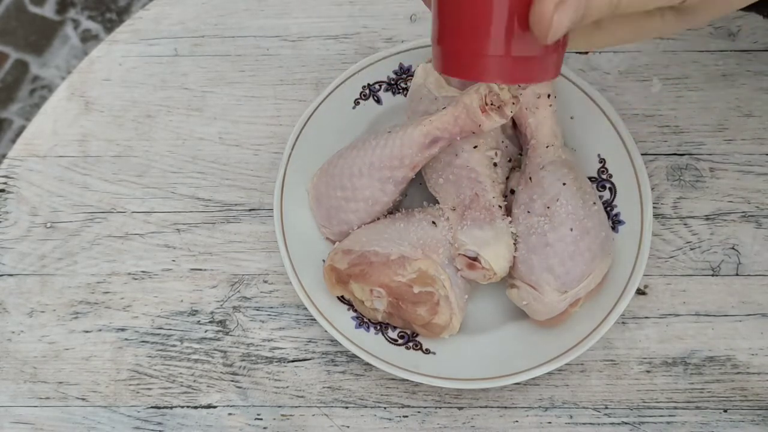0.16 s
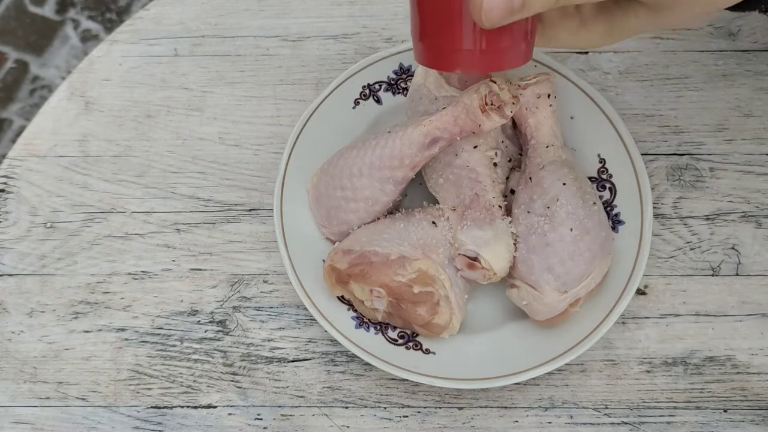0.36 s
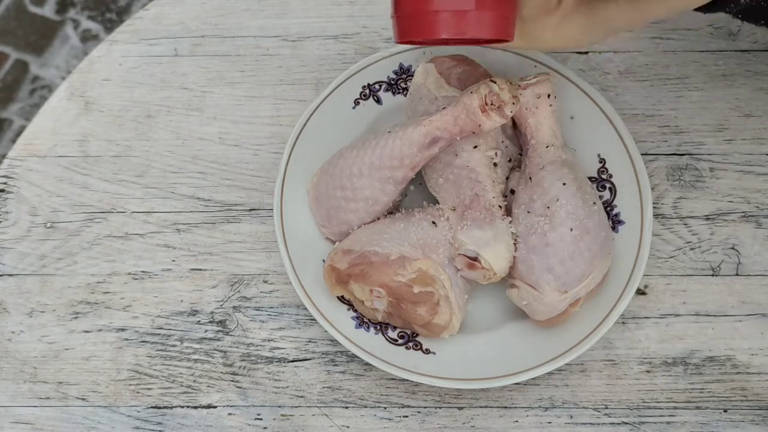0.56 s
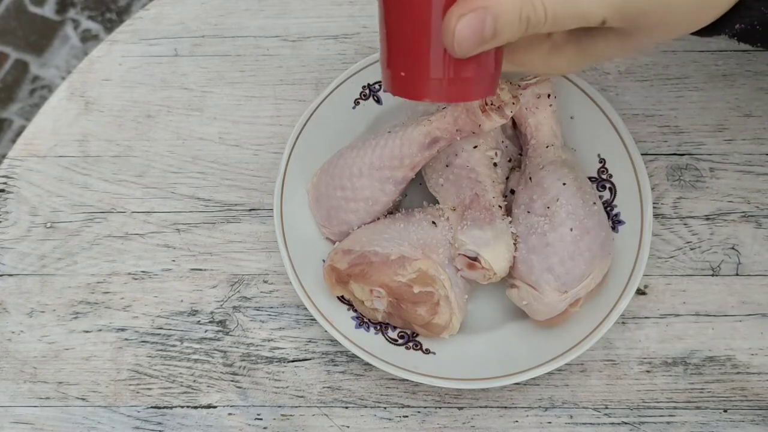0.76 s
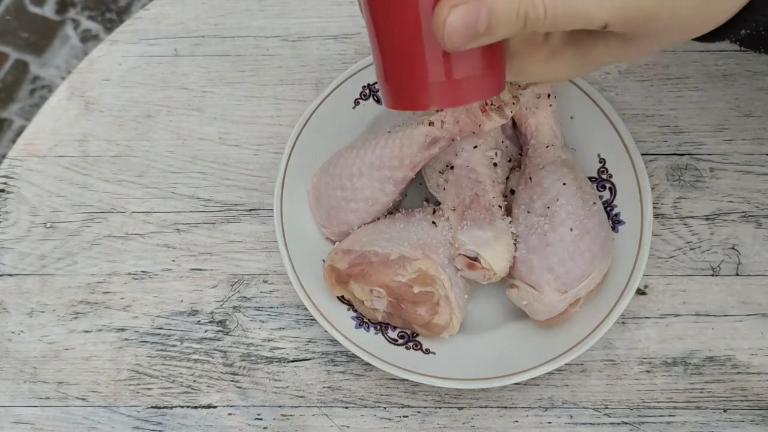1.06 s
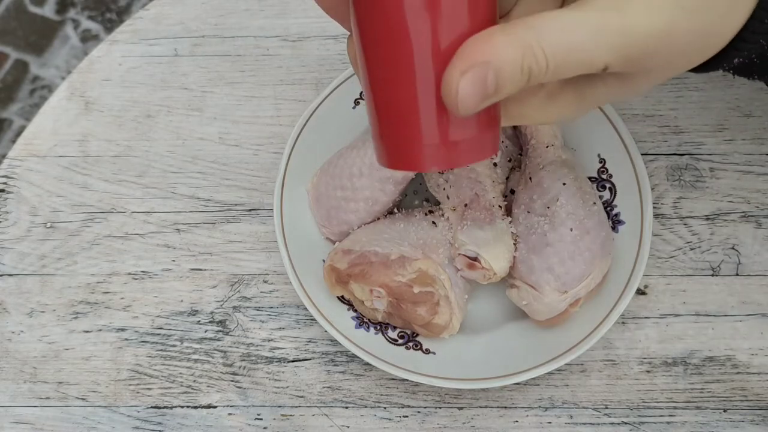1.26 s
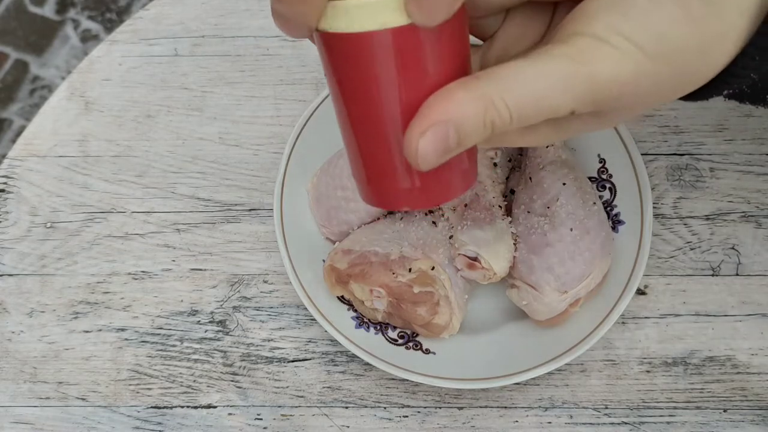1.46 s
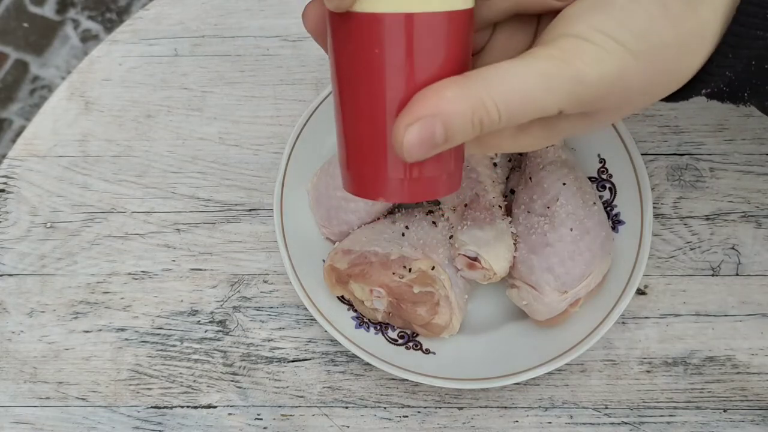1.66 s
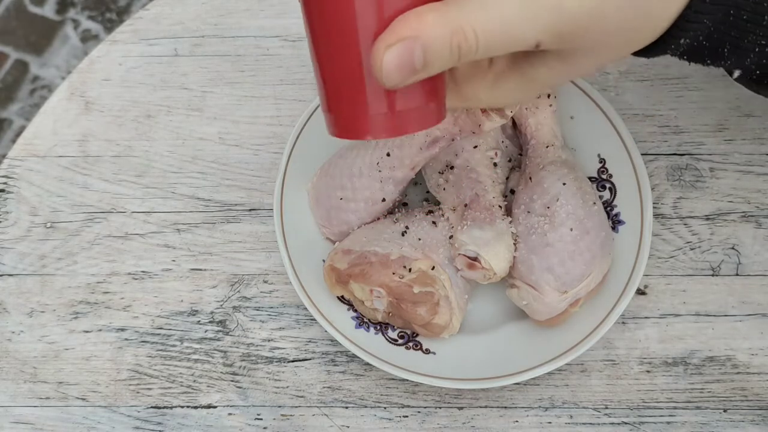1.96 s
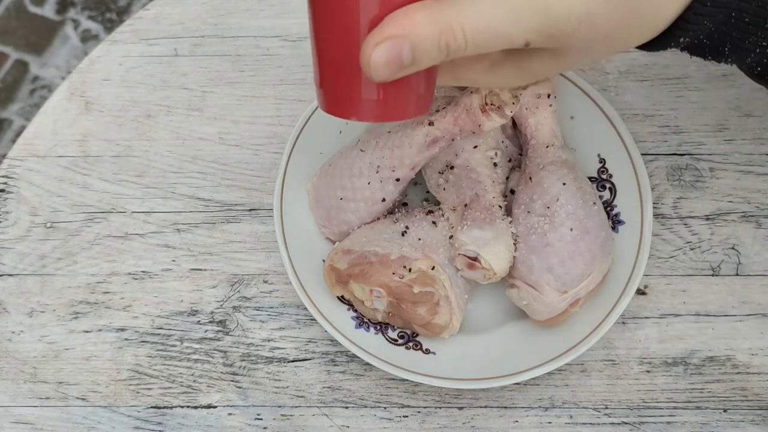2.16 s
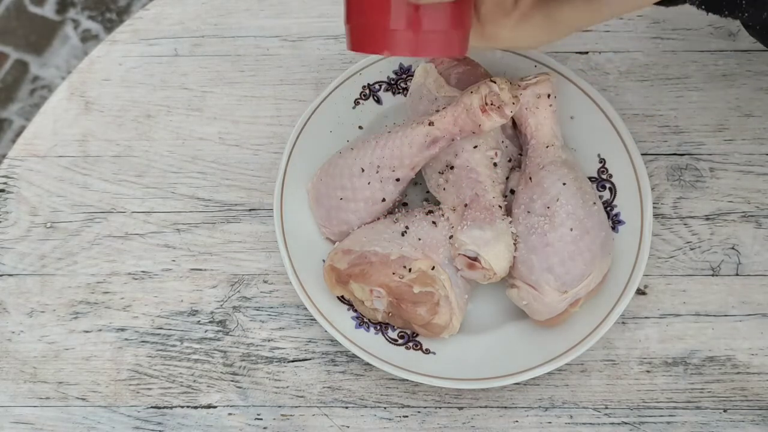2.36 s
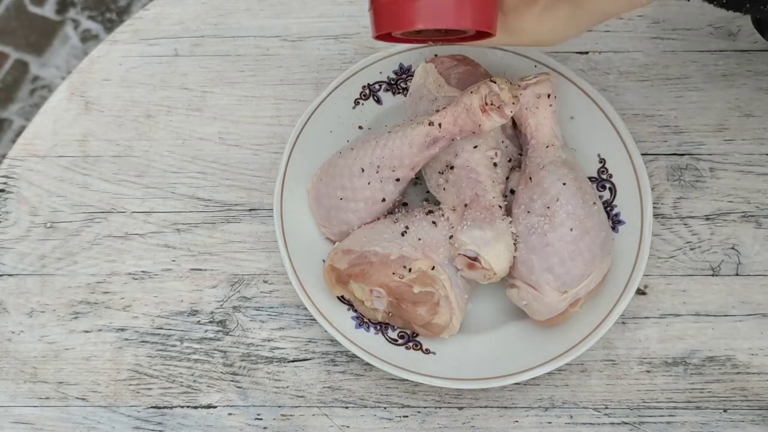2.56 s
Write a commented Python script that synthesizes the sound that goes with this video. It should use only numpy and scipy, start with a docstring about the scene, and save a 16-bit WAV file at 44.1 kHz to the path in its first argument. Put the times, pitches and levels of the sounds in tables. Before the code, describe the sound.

Pepper grinds in a hand mill over an outdoor table, heard close up. Short, uneven twists give a dry crackling crunch with faint plastic creaks, and the peppercorns snap harder toward the end. The open air behind is quiet.

```python
"""A plastic pepper mill, twisted to and fro over an outdoor table, close to a stereo microphone.
Each twist crushes a dense run of tiny fractures that ring the housing, wall, barrel and burr;
whole corns burst in louder cracks. The collar groans as it sticks and slips, and loose grit rattles.
Hand, plate and table give near reflections, and a short echo fades into quiet open air."""
import sys
import numpy as np
from scipy import signal
from scipy.fft import rfft, irfft
from scipy.io import wavfile

SR = 44100
rng = np.random.default_rng(int(sys.argv[2]) if len(sys.argv) > 2 else 0)


def wav_record(signal):
    """Record a signal, one row per channel, as 16-bit PCM in the file named by sys.argv[1]."""
    frames = np.transpose(np.atleast_2d(signal))
    bounded = np.clip(frames, -1, 1)
    # unit amplitude maps onto the largest positive 16-bit level
    quanta = np.round(bounded * 32767).astype(np.int16)
    wavfile.write(sys.argv[1], SR, quanta)


N = 119070

# open air round the table (frequency [Hz], relative level [dB])
AIR_SPECTRUM = [(29, -28), (50, -7.5), (152, -6), (252, -12), (1100, -19), (1660, -19), (2160, -23.5),
                (3950, -30.5), (7040, -31.5), (10100, -28), (11100, -28), (16000, -32)]
# tone of the mill across the microphone (frequency [Hz], left minus right [dB])
BALANCE = [(200, 1), (380, 2.5), (700, -2.5), (1700, 4), (2800, -0.5), (5500, 2), (6900, 12), (8000, -4),
           (11000, 1.5), (13000, 2), (15000, 11)]
# the collar sticking and slipping (start [s], end [s], pitch [Hz], level [dB])
COLLAR_GROANS = [(0.316, 0.372, 437.4, -42.5), (0.482, 0.546, 420.4, -38.5), (1.062, 1.087, 310.5, -36),
                 (2.242, 2.26, 322, -45), (2.443, 2.478, 383.4, -35)]
# loose grit sliding (start [s], end [s], level [dB])
GRIT_SLIDES = [(0, .195, -57.5), (0.207, 0.306, -41), (0.286, 0.422, -51), (0.778, 0.911, -45.5),
               (0.938, 0.949, -48), (1.513, 1.54, -51), (1.633, 1.667, -58), (1.802, 1.85, -54),
               (2.473, 2.504, -53), (2.603, 2.706, -59.5)]
# single bits of grit ticking (time [s], level before trim [dB])
GRIT_TICKS = [(.007, -43.5), (.015, -57), (0.088, -46), (0.095, -46.5), (.144, -47), (.176, -41.5),
              (.209, -36.5), (0.221, -40), (0.235, -39), (0.239, -37.5), (0.252, -37), (0.411, -43),
              (.438, -50), (0.614, -44), (0.622, -48), (0.642, -44), (1.392, -38.5), (1.899, -53),
              (2.217, -45), (2.272, -56), (2.312, -60)]
# resonances of the grit and the mill's four parts (frequency [Hz], width [Hz], relative level [dB])
GRIT_MODES = [(670, 950, -1.5), (3300, 870, -4), (5130, 2100, -5.5), (7380, 390, 9.5), (9670, 1300, -0.5),
              (12500, 1300, 0), (13800, 1500, 0)]
HOUSING_MODES = [(276.5, 115, 2), (393, 163, 3)]
WALL_MODES = [(650, 208, -1.5), (821, 193, 2.5), (1077, 510, -5)]
BARREL_MODES = [(1323, 287, -2.5), (1830, 318, 6.5), (2060, 450, 7.5), (2476, 2230, -5.5)]
BURR_MODES = [(3820, 5600, -12.5), (5190, 740, -4), (7003, 490, -2), (9000, 1580, -5), (10500, 2200, -3),
              (12980, 5120, -2.5), (14430, 1800, 3.5)]
# bands that housing, wall, barrel and burr radiate (low [Hz], high [Hz])
PART_BANDS = [(120, 514), (500, 2280), (950, 2890), (3000, 11220)]
# single resonances that the hardest snaps bring out (time [s], frequency [Hz], level [dB])
SNAPS = [(1.62, 2510, -35.5), (1.7265, 422, -34), (1.7247, 4170, -28.5), (1.7239, 6820, -30.5),
         (1.7245, 10030, -27), (2.086, 2880, -35), (2.085, 5830, -42.5), (2.409, 1160, -31),
         (2.4082, 5700, -26.5), (2.4076, 8770, -26), (2.4079, 10100, -24), (2.422, 8400, -33.5),
         (2.515, 7120, -22.5), (2.515, 15000, -29)]
# whole corns bursting, levels before trim
# (time [s], decay [s], housing [dB], wall [dB], barrel [dB], burr [dB], barrel ring [Hz])
CORN_CRACKS = [(0.2634, 0.0036, -37.5, -56, -39, -41, 1860), (0.2938, 0.0033, -47, -43, -56, -40, 1670),
               (0.3278, 0.0011, -41.5, -51, -48, -39, 1420), (0.3456, 0.0037, -42.5, -59, -47, -37, 1860),
               (0.4577, 0.0028, -51, -47, -54, -52, 1600), (0.4803, 0.00097, -62, -41, -55, -67, 1480),
               (0.5236, 0.0017, -46, -39.5, -44, -32.5, 1710), (0.583, 0.0015, -42.5, -50, -52, -43, 1730),
               (0.6695, 0.0034, -71, -53, -35.5, -32, 2030), (0.6799, 0.00036, -76, -62, -39, -35, 1790),
               (0.7632, 0.002, -54, -52, -58, -49, 1730), (0.8593, 0.0023, -52, -62, -41, -49, 1700),
               (0.8804, 0.0035, -78, -46, -35, -33.5, 1830), (0.905, 0.0047, -62, -65, -37, -36.5, 1850),
               (0.95, 0.00089, -38, -63, -46, -44, 1600), (1.054, 0.00078, -39.5, -35.5, -37.5, -28, 1820),
               (1.07, 0.0024, -31, -32.5, -40.5, -31, 2130), (1.15, 0.0023, -39, -41, -39, -43, 1890),
               (1.1553, 0.0031, -46, -53, -34, -31, 2160), (1.346, 0.0042, -49, -47.5, -66, -63, 1720),
               (1.3823, 0.003, -43.5, -65, -37.5, -36, 1870), (1.465, 0.00035, -71, -67, -35.5, -33, 1950),
               (1.5487, 0.0016, -54, -51.5, -62, -61, 1530), (1.621, 0.0024, -57, -39.5, -37, -34, 2100),
               (1.7248, 0.0035, -38, -34, -27, -23, 1450), (1.7297, 0.0034, -41, -40.5, -30.5, -25, 2200),
               (1.8448, 0.0075, -43, -36, -33.5, -35.5, 2080), (1.9211, 0.002, -49, -43, -64, -34.5, 1820),
               (1.9333, 0.0037, -71, -49, -35, -35, 1900), (2.086, 0.0031, -47, -45, -46, -33, 2120),
               (2.1438, 0.0012, -38, -37.5, -36, -30, 1900), (2.1785, 0.0011, -58, -41.5, -39, -65, 2200),
               (2.3317, 0.0023, -58, -48, -44.5, -52, 1580),
               (2.3436, 0.00085, -43, -37, -47.5, -38.5, 2280),
               (2.4069, 0.0028, -34, -26, -42, -20.5, 1430), (2.41, 0.0066, -28.5, -31, -29, -24, 1900),
               (2.4232, 0.0017, -43, -42, -32, -32.5, 2000), (2.439, 0.0018, -42, -52, -35.5, -52, 1910),
               (2.499, 0.00077, -70, -55, -39, -36.5, 1920), (2.512, 0.0048, -31.5, -63, -31.5, -29, 2110),
               (2.515, 0.005, -66, -32.5, -24.5, -21, 2000), (2.529, 0.00081, -40, -43.5, -36, -51, 1590),
               (2.5346, 0.0024, -46, -38.5, -35.5, -54, 2000), (2.548, 0.0018, -50, -80, -36, -31, 1810),
               (2.5648, 0.0021, -70, -70, -44, -39, 1940)]
# twists of the mill, levels before trim
# (start [s], end [s], housing [dB], wall [dB], barrel [dB], burr [dB], barrel ring [Hz])
MILL_TWISTS = [(0.01, 0.108, -61.5, -62.5, -69, -57, 1700), (0.204, 0.246, -55, -76, -59, -47, 1900),
               (0.263, 0.394, -51, -53, -51.5, -48, 1630), (0.481, 0.551, -46.5, -47, -46.5, -46.5, 1600),
               (0.573, 0.69, -47, -44.5, -44.5, -45, 1910), (0.772, 0.913, -54, -50, -42, -47, 1730),
               (1.039, 1.111, -44.5, -45.5, -46.5, -47.5, 1680),
               (1.138, 1.175, -46, -53, -40.5, -47.5, 2100), (1.193, 1.246, -47, -42.5, -41, -46, 1740),
               (1.356, 1.513, -51.5, -49, -42.5, -45.5, 1730), (1.609, 1.621, -67, -45.5, -60, -52, 2120),
               (1.746, 1.766, -54, -42.5, -39.5, -44, 1940), (1.865, 1.927, -48.5, -46, -39.5, -46, 1860),
               (2.1, 2.123, -50, -50, -51, -51.5, 1600), (2.134, 2.217, -51, -46, -43, -44, 1890),
               (2.243, 2.27, -46, -47.5, -53, -51.5, 1530), (2.326, 2.346, -45.5, -53, -48, -49, 2040),
               (2.414, 2.466, -64, -44.5, -42.5, -42, 2040), (2.509, 2.581, -69, -48.5, -40.5, -43, 1880)]
# trims (housing [dB], wall [dB], barrel [dB], burr [dB])
TWIST_TRIM_DB, CRACK_TRIM_DB = [-0.3, -2.5, -1.42, 2.5], [-0.36, 0.16, -0.75, -5.5]

BARREL_HZ = 1935  # centre of the barrel's ring before the grip shifts it
ATTACK_S, RELEASE_S = 0.0083, 0.0077  # of a run of grains
BURST_WINDOW_S = 0.01  # a burst has the energy of its level held this long


def undb(db):
    """Decibels to gain."""
    return 10 ** (np.asarray(db) / 20)


def unit(x):
    """Scale to rms 1."""
    return x / np.sqrt(np.mean(x ** 2) + 1e-20)


def colour(x, points):
    """Shape a sound by points of (frequency [Hz], gain [dB])."""
    hz, db = np.array(points, float).T
    f = np.maximum(np.fft.rfftfreq(x.shape[-1], 1 / SR), 1)
    return irfft(rfft(x) * undb(np.interp(np.log(f), np.log(hz), db)), x.shape[-1])


def wander(size, rate_hz):
    """A smooth random curve of rms 1."""
    knots = rng.standard_normal(4096)
    return unit(np.interp(np.arange(size) / SR * rate_hz, np.arange(len(knots)), knots))


def add(out, x, start_s, db, over_s):
    """Mix in a stereo sound whose energy equals that level held for that long."""
    i = int(round(start_s * SR))
    x = x * undb(db) * np.sqrt(2 * over_s * SR / (np.sum(x ** 2) + 1e-20))
    x, i = x[:, max(-i, 0):], max(i, 0)
    out[:, i:i + x.shape[1]] += x[:, :max(N - i, 0)]


def open_air(mid_db=-59, side_ratio_db=-4.5, low_cut_hz=59):
    """Quiet, steady outdoor ambience all round the microphone, without deep rumble."""
    low_cut = signal.butter(2, low_cut_hz, "high", fs=SR, output="sos")
    noises = colour(rng.standard_normal((2, N)), AIR_SPECTRUM)
    mid, side = (unit(signal.sosfilt(low_cut, noise)) for noise in noises)
    return undb(mid_db) * (mid + undb(side_ratio_db) * side * np.array([[1], [-1]]))


def echo(x, t60_s=0.23, send_db=-13):
    """A short, bright, diffuse tail from the surroundings, different in each channel."""
    t = np.arange(16384) / SR
    envelope = np.exp(-np.log(1000) * t / t60_s) * (1 - np.exp(-t / 0.0012))
    tail = rng.standard_normal((2, len(t))) * envelope
    tail /= np.sqrt(np.sum(tail ** 2, axis=1, keepdims=True))
    wet = signal.fftconvolve(x, tail, axes=1)[:, :N]
    return undb(send_db) * colour(wet, [(300, -11), (1500, -3.5), (7000, 1.5), (15000, 1.5)])


def at_microphone(push, lag_samples=4, decay_s=0.0012, low_cut_hz=1090):
    """Direct sound reaches the right side first; reflections off hand, plate and table follow."""
    t = np.arange(512) / SR
    paths = rng.standard_normal((2, len(t))) * np.exp(-t / decay_s)
    paths /= np.sqrt(np.sum(paths ** 2, axis=1, keepdims=True))
    paths = signal.sosfilt(signal.butter(1, low_cut_hz, "high", fs=SR, output="sos"), paths)
    paths[0, lag_samples] += 1
    paths[1, 0] += 1
    return signal.fftconvolve(push[None], paths, axes=1)[:, :len(push)]


def collar_groaning(jitter=0.136, flutter_db=1):
    """The collar sticks and slips, juddering at an unsteady pitch."""
    out, t = np.zeros((2, N)), np.arange(4096) / SR
    for start, end, hz, db in COLLAR_GROANS:
        length = end - start
        pitch = hz * (1 + jitter * wander(len(t), rate_hz=242))
        phase = 2 * np.pi * np.cumsum(pitch) / SR
        tone = np.sin(phase) + undb(-9.5) * np.sin(2 * phase)
        swell = np.sqrt(np.abs(np.sin(np.pi * np.minimum(t / length, 1))))
        flutter = undb(flutter_db * wander(len(t), rate_hz=240))
        add(out, at_microphone(swell * flutter * tone), start, db, length)
    return out


def ring(push, modes, band_hz, shift=1):
    """Pass a push through the resonances of one part, within the band that it radiates."""
    size = push.shape[-1]
    f = np.maximum(np.fft.rfftfreq(size, 1 / SR), 1) / shift
    response = sum((-1) ** k * undb(db) / (1 + 1j * (f * f - hz * hz) / (f * width))
                   for k, (hz, width, db) in enumerate(modes))
    band = signal.butter(2, np.minimum(band_hz, 0.45 * SR), "band", fs=SR, output="sos")
    return signal.sosfilt(band, irfft(rfft(push) * response, size))


def ring_parts(push, barrel_hz):
    """One push rings housing, wall, barrel and burr; the grip retunes the barrel."""
    modes = [HOUSING_MODES, WALL_MODES, BARREL_MODES, BURR_MODES]
    shifts = [1, 1, barrel_hz / BARREL_HZ, 1]
    return [ring(push, *part) for part in zip(modes, PART_BANDS, shifts)]


def fractures(size, per_s, spread_db):
    """Tiny breaks at random moments, mostly weak, a few strong."""
    hits = rng.random(size) < per_s / SR
    sign = rng.choice([-1, 1], size)
    strength = np.minimum(rng.exponential(size=size), 4)
    return hits * sign * undb(spread_db * strength)


def run_of_grains(length_s, per_s=4500, places=3, crunch_db=2):
    """An uneven run of fractures at several places round the burr; returns it and its lead-in [s]."""
    t = np.arange(-2048, 14336) / SR
    hold = np.exp(np.minimum(t, 0) / ATTACK_S - np.maximum(t - length_s, 0) / RELEASE_S)
    crunch = hold * undb(crunch_db * wander(len(t), rate_hz=200))
    runs = (fractures(len(t), per_s / places, spread_db=3.5) * crunch for _ in range(places))
    return sum(at_microphone(run) for run in runs), -t[0]


def soften_peaks(push, evenness=0.23):
    """Partly even out chance peaks in a push's spectrum, so that its pitch comes from the mill."""
    spectrum = rfft(push)
    strength = np.sqrt(np.mean(np.abs(spectrum) ** 2, axis=0))
    return irfft(spectrum / (strength + 0.2 * np.mean(strength) + 1e-12) ** evenness, push.shape[1])


def burst(decay_s, rise_s=0.00068):
    """A sudden dry shower of splinters that ends abruptly; returns it and its lead-in [s]."""
    t = np.arange(-256, 3840) / SR
    envelope = np.exp(np.minimum(t, 0) / rise_s - (np.maximum(t, 0) / decay_s) ** 1.5)
    splinters = fractures(len(t), per_s=16000, spread_db=2.5) * envelope
    fade = np.minimum((t[-1] - t) / t[-1] * 2, 1) ** 2
    return fade * soften_peaks(at_microphone(splinters)), -t[0]


def loose_grit(band_hz=(350, 18000), tick_trim_db=-0.5):
    """Loose bits slide and tick, too light to move the housing."""
    out = np.zeros((2, N))
    for start, end, db in GRIT_SLIDES:
        push, lead = run_of_grains(end - start)
        add(out, ring(push, GRIT_MODES, band_hz), start - lead, db, end - start + RELEASE_S / 2)
    for at, db in GRIT_TICKS:
        push, lead = burst(decay_s=0.0017)
        add(out, ring(push, GRIT_MODES, band_hz), at - lead, db + tick_trim_db, BURST_WINDOW_S)
    return out


def corns_cracking():
    """Whole corns give way and ring the mill; the hardest snaps also bring out single resonances."""
    out = np.zeros((2, N))
    for at, decay, *levels, barrel_hz in CORN_CRACKS:
        push, lead = burst(decay)
        for part, db, trim in zip(ring_parts(push, barrel_hz), levels, CRACK_TRIM_DB):
            add(out, part, at - lead, db + trim, BURST_WINDOW_S)
    for at, hz, db in SNAPS:
        push, lead = burst(decay_s=0.0019)
        width_hz = 140 + hz / 28  # higher rings are wider and die sooner
        snap = ring(push, [(hz, width_hz, 0)], band_hz=(hz / 2, hz * 2))
        add(out, snap, at - lead, db, BURST_WINDOW_S)
    return out


def mill_grinding():
    """Each twist crushes pepper between the burrs and rings the mill, right by the microphone."""
    out = np.zeros((2, N))
    for start, end, *levels, barrel_hz in MILL_TWISTS:
        push, lead = run_of_grains(end - start)
        for part, db, trim in zip(ring_parts(push, barrel_hz), levels, TWIST_TRIM_DB):
            add(out, part, start - lead, db + trim, end - start + RELEASE_S / 2)
    return out


def scene():
    """The mill close up, with its short echo and the open air behind it."""
    mill = mill_grinding() + corns_cracking() + loose_grit() + collar_groaning()
    left, right = mill + echo(mill)
    left = colour(left, [(hz, db / 2) for hz, db in BALANCE])
    right = colour(right, [(hz, -db / 2) for hz, db in BALANCE])
    return np.array([left, right]) + open_air()


def record(dry):
    """The recorder rounds the tallest peaks and cuts the top."""
    ceiling, top_hz = 0.42, 15900
    rounded = ceiling * np.tanh(dry / ceiling)
    return signal.sosfilt(signal.ellip(10, 0.2, 80, top_hz, fs=SR, output="sos"), rounded)


dry = scene()
out = record(dry)
wav_record(out)
```